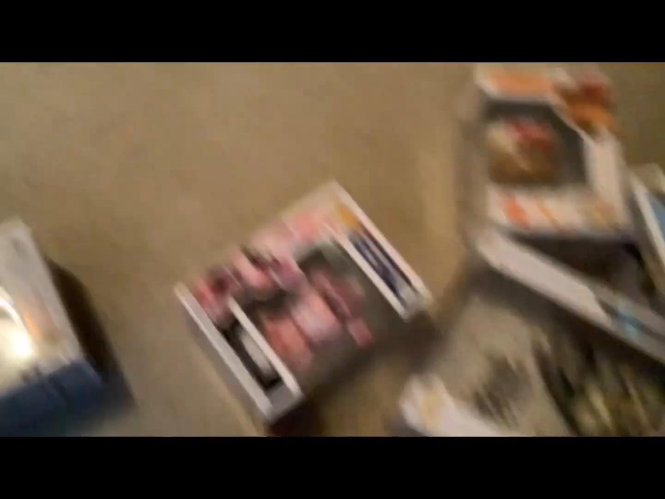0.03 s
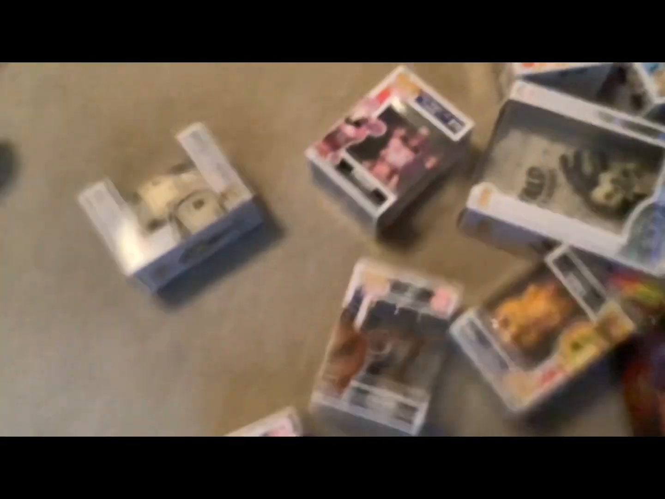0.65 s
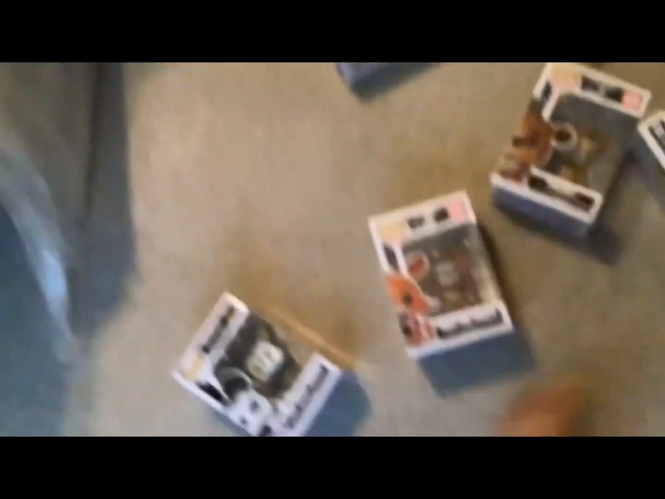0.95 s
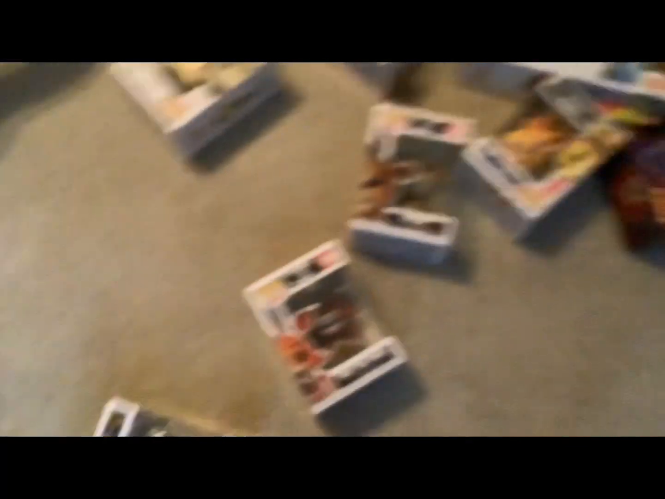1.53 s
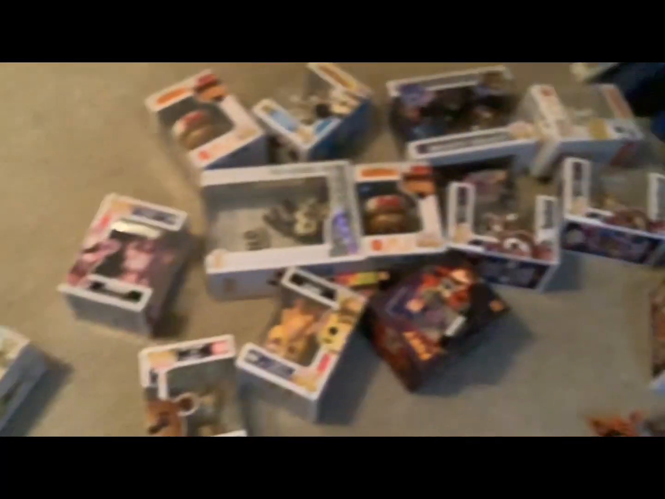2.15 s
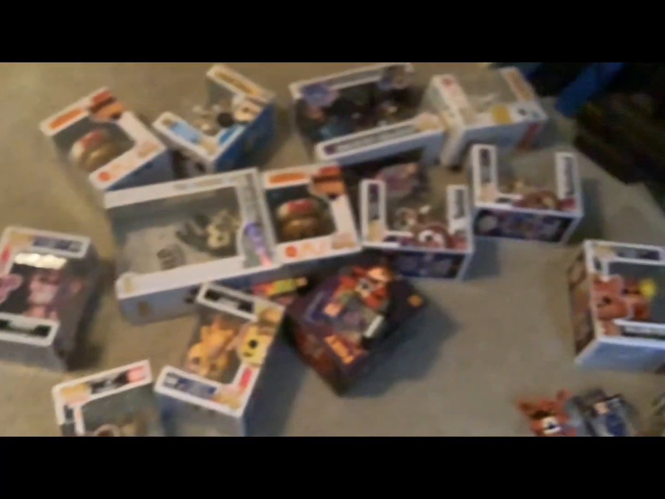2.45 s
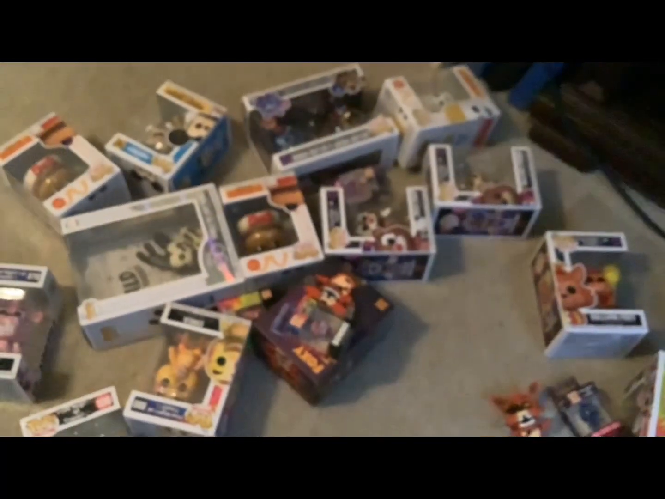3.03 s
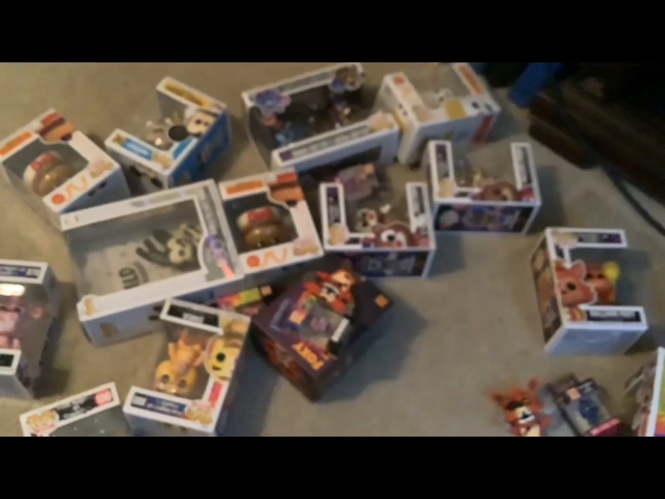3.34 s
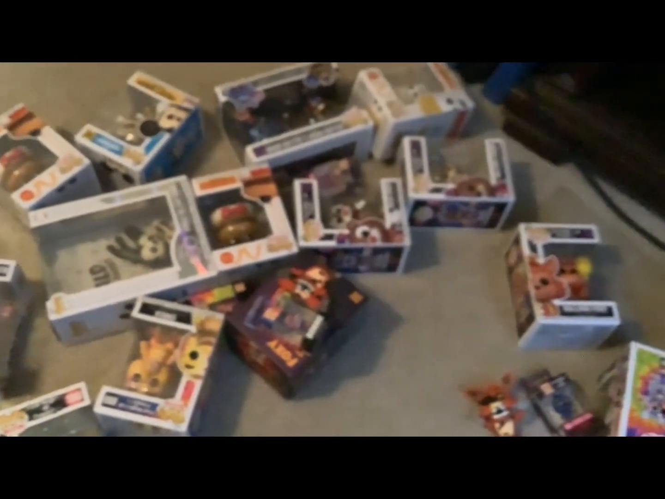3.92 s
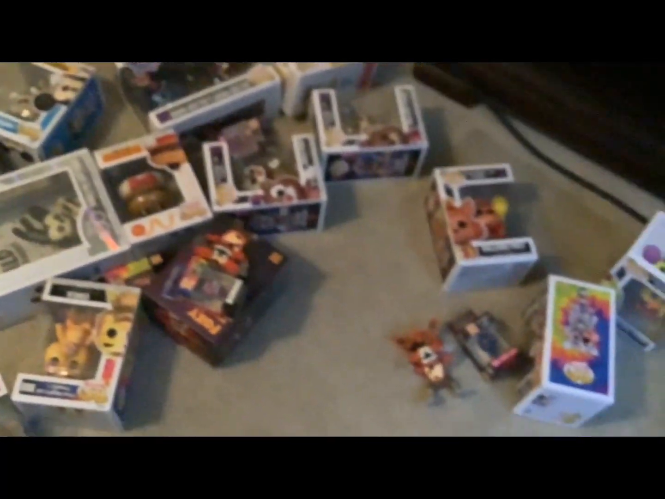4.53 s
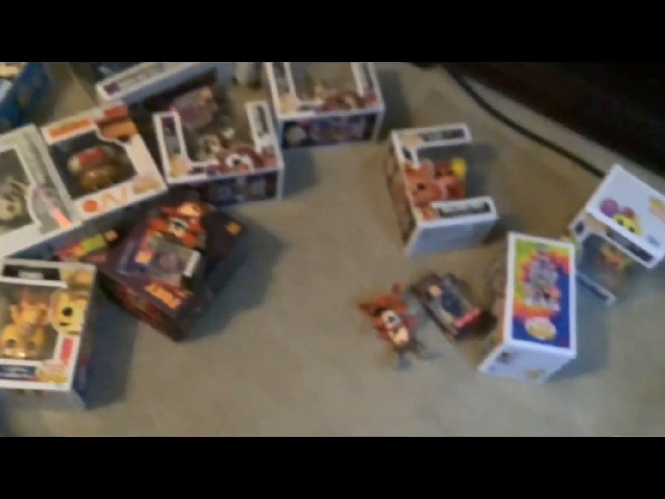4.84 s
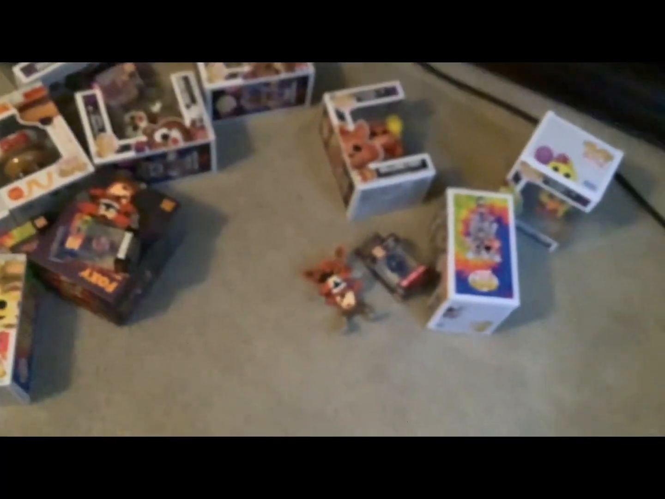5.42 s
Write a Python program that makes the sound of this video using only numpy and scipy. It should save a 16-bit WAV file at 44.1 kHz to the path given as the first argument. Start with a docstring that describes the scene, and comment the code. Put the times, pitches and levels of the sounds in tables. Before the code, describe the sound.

In a small, quiet carpeted room, a finger knocks against a handheld camera with one loud, close thump and briefly scrapes across the case. A few handling ticks follow. Soft footsteps and rustling clothes then grow a little, with a cluster of sharp clicks from small things underfoot. The clicks become sparser and fainter, and the movement settles to near quiet.

```python
"""A small carpeted room, where someone steps around with a camera in hand. A finger bumps the case
with a loud thump and slides off it, and the case ticks under the grip. These knocks reach the microphone
as bending waves in the camera's shell, treble first. Small things click underfoot, heard through the air
with the room's echo. Soft steps, rustling clothes and the quiet of the house lie underneath."""
import sys
import numpy as np
from scipy import signal
from scipy.fft import rfft, irfft
from scipy.io import wavfile

SR = 44100
rng = np.random.default_rng(int(sys.argv[2]) if len(sys.argv) > 2 else 0)


def unload_wav(signal):
    """Save mono or channel-first audio to the path in sys.argv[1] as 16-bit WAV at rate SR, clipped to [-1, 1]."""
    wavfile.write(
        sys.argv[1],
        SR,
        np.round(np.clip(np.atleast_2d(signal).T, -1, 1) * 32767).astype(np.int16),
    )


N = 250488
SIZE = 16384  # samples of working space for one knock or echo
TIME = np.arange(N) / SR
SCENE_HZ = np.maximum(np.fft.rfftfreq(N, 1 / SR), 1)
KNOCK_HZ = np.maximum(np.fft.rfftfreq(SIZE, 1 / SR), 1)

# The tone of the camera's shell: pitch_hz, relative_db
SHELL_TONE = [(30, -40), (200, -6.5), (500, 5.5), (1100, 2), (2000, -0.5), (3200, -7.5), (4700, -6),
              (6500, -15), (9000, -18.5), (16000, -29.5)]
# Arm moves that rub the clothes and shift the hand: time_s, hold_s, cloth_relative_db, skin_relative_db
ARM_MOVES = [(0.055, 0.022, -63.5, -67), (0.191, 0.012, -78, -66), (0.376, .035, -73.5, -65.5),
             (0.465, 0.023, -70.5, -76), (1.103, 0.12, -65.5, -74), (1.518, 0.039, -67, -76.5),
             (2.169, 0.037, -53, -62), (2.32, 0.097, -56.5, -60.5), (2.484, 0.17, -63, -66),
             (2.617, 0.11, -57, -63), (2.847, 0.089, -58.5, -63.5), (3.02, 0.079, -67, -99),
             (3.36, 0.34, -74, -77), (3.713, 0.093, -79, -70.5), (3.911, 0.034, -66, -63),
             (4.08, 0.13, -75.5, -72.5), (4.258, 0.15, -68.5, -69), (5.58, .05, -73, -78)]
ARM_ATTACK_S, ARM_FALL_DB_PER_S = 0.032, 139.5


def undb(db):
    """Turn decibels into a gain to multiply by."""
    return 10 ** (np.asarray(db) / 20)


def unit(x):
    """Scale a signal to an average strength (rms) of 1."""
    return x / np.std(x)


def along(points, hz):
    """Read between (pitch, value) points, with octaves evenly spaced."""
    pitches, values = np.transpose(points)
    return np.interp(np.log(hz), np.log(pitches), values)


def colour(x, tone):
    """Shape a sound's bass and treble, and scale it to strength 1."""
    return unit(irfft(rfft(x) * undb(along(tone, SCENE_HZ)), N))


def add(out, start_s, x, peak_db):
    """Mix x into out at the given time and peak level."""
    start = int(start_s * SR)
    part = x[:N - start]
    out[start:start + len(part)] += part * undb(peak_db) / np.abs(x).max()


def wander(turns_per_s):
    """A curve that drifts at random, with a spread near 1."""
    knots = rng.standard_normal(4096)
    return unit(np.interp(TIME * turns_per_s, np.arange(len(knots)), knots))


def contact(tone, bright_db, pitch_hz, ring_db, ring_q):
    """Spectrum of one hit: each has its own brightness, and the spot that is hit rings at its own pitch."""
    octaves = np.log2(np.maximum(KNOCK_HZ, 400) / 1000)
    log_gain = np.log(undb(along(tone, KNOCK_HZ) + bright_db * octaves))
    # keeping half the cepstrum means nothing sounds before the hit
    cepstrum = irfft(log_gain)[:SIZE // 2]
    ring = 1 + undb(ring_db) / (1 + 1j * ring_q * (KNOCK_HZ / pitch_hz - pitch_hz / KNOCK_HZ))
    return np.exp(rfft(2 * cepstrum, SIZE) - cepstrum[0]) * ring


def bend(spectrum, lag_s):
    """High bending waves travel faster than low ones, so a knock becomes a short falling chirp."""
    turns = lag_s * (2 * np.sqrt(1000 * KNOCK_HZ) - KNOCK_HZ * np.sqrt(2000 / SR))
    return irfft(spectrum * np.exp(-2j * np.pi * turns))[:SIZE // 2]


def scatter(share_db, decay_s):
    """Spectrum of a pulse followed by a dying cloud of reflections."""
    cloud = rng.standard_normal(SIZE) * np.exp(-np.arange(SIZE) / SR / decay_s)
    return 1 + undb(share_db) * rfft(cloud) / np.linalg.norm(cloud)


def pops(per_s, spread_db, max_spreads):
    """Tiny pulses of uneven size at random times."""
    sizes = undb(spread_db * np.minimum(rng.exponential(size=N), max_spreads))
    signs = rng.choice([-1, 1], N)
    return sizes * signs * (rng.random(N) < per_s / SR)


def friction(grains_per_s, spread_db, grain_db, flutter_db, flutter_per_s):
    """Surfaces catch and slip: lone grains over a dense hiss, at an uneven level."""
    grains = unit(pops(grains_per_s, spread_db, max_spreads=4))
    rub = rng.standard_normal(N) + undb(grain_db) * grains
    return rub * undb(flutter_db * wander(flutter_per_s))


def strokes(rows, attack_s, fall_db_per_s):
    """Loudness curve of strokes: each swells up to its time, holds, then dies away."""
    power = np.zeros(N)
    for time_s, hold_s, level_db in rows:
        swell = np.exp(np.minimum(TIME - time_s, 0) / attack_s)
        fall_db = fall_db_per_s * np.maximum(TIME - time_s - hold_s, 0)
        power += (swell * undb(level_db - fall_db)) ** 2
    return np.sqrt(power)


def stirring(level_db, still_s=4.5, fall_db_per_s=117):
    """Loudness curve of faint, steady motion that settles once the walker stands still."""
    return undb(level_db - fall_db_per_s * np.maximum(TIME - still_s, 0))


def quiet_house(level_db=-75.5):
    """The house makes a faint, steady, low noise."""
    # The tone of the quiet: pitch_hz, relative_db
    house_tone = [(15, -47.5), (25, -17.5), (64, -1), (97, 0.5), (170, -9), (373, -7), (463, -11),
                  (754, -15.5), (1040, -23), (1560, -26), (5000, -29.5), (6920, -30), (16000, -25)]
    return colour(rng.standard_normal(N), house_tone) * undb(level_db)


def room_echo(x, gap_s=0.0048):
    """Reflections blur into a short tail, and the treble dies first."""
    # How long the room takes to fade by 60 dB: pitch_hz, fade_s
    fade_times = [(100, 0.45), (500, 0.6), (2000, 0.3), (5000, 0.21), (15000, 0.12)]
    pitches, fades = np.transpose(fade_times)
    t, tail = np.arange(SIZE) / SR, np.zeros(SIZE)
    noise = rfft(rng.standard_normal(SIZE))
    for fade_s, one_band in zip(fades, np.eye(len(fades))):
        band = along(np.column_stack([pitches, one_band]), KNOCK_HZ)
        tail += irfft(noise * band) * undb(-60 * t / fade_s)
    tail *= t > gap_s
    return signal.fftconvolve(x, tail / np.linalg.norm(tail))[:N]


def footsteps():
    """Feet press softly on the carpet and make a low rumble."""
    # Steps and shifts of weight: time_s, hold_s, level_db
    steps = [(0.052, 0.043, -63), (0.482, 0.028, -58.5), (0.605, 0.12, -63), (0.843, 0.076, -53.5),
             (1.101, .07, -63), (1.209, 0.1, -60), (1.381, 0.13, -66), (1.71, 0.02, -57.5),
             (2.144, 0.068, -47.5), (2.316, 0.1, -54), (2.467, .1, -60), (2.649, 0.03, -48),
             (2.76, 0.4, -61.5), (3.299, 0.23, -71), (3.757, 0.033, -62), (4.102, 0.18, -66.5),
             (4.291, 0.11, -61.5), (4.788, 0.027, -62.5), (5.06, 0.027, -66), (5.462, 0.02, -65.5),
             (5.569, .06, -69)]
    # The dull tone of feet on carpet: pitch_hz, relative_db
    tread_tone = [(25, -45), (50, -26), (80, -5), (115, 2), (165, -4), (235, -1.5), (380, -5), (600, -9.5),
                  (1200, -24.5), (3000, -47)]
    weight = np.hypot(strokes(steps, attack_s=0.019, fall_db_per_s=209.5), stirring(-72))
    noise = rng.standard_normal(N) * undb(0.79 * wander(25))
    return colour(noise, tread_tone) * weight


def crinkles():
    """Creases in the moving cloth give way with little snaps."""
    # The tone of the snaps: pitch_hz, relative_db
    snap_tone = [(200, -15), (800, -4), (2000, -3), (3200, -7), (4600, 0), (6500, -13), (16000, -26)]
    snaps = pops(per_s=70, spread_db=4, max_spreads=2)
    smear = irfft(scatter(share_db=2.17, decay_s=0.002))
    return colour(signal.fftconvolve(snaps, smear)[:N], snap_tone)


def rustling_clothes(brisk_db=-56, brightening=0.37):
    """Fibres rub as the arms move; brisk rubbing brings out a bright swish and crinkles."""
    # The tone of soft rubbing: pitch_hz, relative_db
    cloth_tone = [(150, -15), (250, -2.5), (550, 4.5), (950, -4.5), (1400, -2.5), (2200, -5), (3000, -19.5),
                  (6000, -27.5), (16000, -40)]
    # The tone of brisk rubbing: pitch_hz, relative_db
    swish_tone = [(500, -15), (1000, -2.5), (2000, -1), (3000, 0), (4500, -2), (6500, -13), (16000, -24)]
    moves = [(time_s, hold_s, cloth_db) for time_s, hold_s, cloth_db, _ in ARM_MOVES]
    rub = np.hypot(strokes(moves, ARM_ATTACK_S, ARM_FALL_DB_PER_S), stirring(-76.5))
    fibres = friction(grains_per_s=200, spread_db=2, grain_db=-5, flutter_db=2, flutter_per_s=50)
    cloth = colour(fibres, cloth_tone) * undb(-1.5)
    swish = colour(fibres, swish_tone) * undb(-5.5) + crinkles() * undb(-9)
    briskness = (rub / undb(brisk_db)) ** brightening
    return (cloth + swish * briskness) * rub


def shifting_hand():
    """Skin slips on the case with a thin hiss as the arms move."""
    # The tone of slipping skin: pitch_hz, relative_db
    hiss_tone = [(1500, -15), (4000, -5), (8000, -0.5), (12000, 0.5), (15500, 1.5)]
    moves = [(time_s, hold_s, skin_db) for time_s, hold_s, _, skin_db in ARM_MOVES]
    slip = np.hypot(strokes(moves, ARM_ATTACK_S, ARM_FALL_DB_PER_S), stirring(-90))
    skin = friction(grains_per_s=1500, spread_db=2.5, grain_db=-9.5, flutter_db=1.5, flutter_per_s=40)
    return colour(skin, hiss_tone) * slip * undb(0.87)


def floor_clicks():
    """Small things crack and ring underfoot. Returns the direct sound and the sound sent to the room."""
    # Clicks and creaks: start_s, peak_db, bright_db_per_octave, pitch_hz, room_relative_db
    clicks = [(2.1530, -34, -0.5, 4720, 1), (2.1650, -33.5, -2.5, 1910, -8), (2.2130, -41, 0, 4500, -3),
              (2.3570, -44, 2.5, 4300, -4.5), (2.5935, -21, 3, 4860, -14.5), (2.6006, -32, 1, 4600, -2.5),
              (2.6515, -32.5, 9, 11000, -1.5), (2.7056, -42.5, 4.5, 4500, 4),
              (2.7782, -38.5, -0.5, 1900, -4), (2.8330, -20, 2.5, 4250, -3),
              (2.9188, -32.5, 3.5, 3800, -7.5), (2.9680, -37.5, 0, 1210, -12), (3.7490, -41, 3, 1406, 3),
              (3.8069, -39.5, 3, 900, -2.5), (4.0997, -46, 0, 1210, -2), (4.2795, -48.5, 10, 2460, 6.5),
              (4.3291, -33.5, 2, 1983, -3.5), (4.5057, -43, 0.5, 2055, -1), (4.7900, -58.5, -3.5, 802, -3),
              (5.0545, -49, -2, 561, -6), (5.3850, -59.5, 0, 850, 5), (5.4561, -43, -2.5, 2900, 0.5),
              (5.5644, -43, -1, 2100, 1.5)]
    # The tone they share: pitch_hz, relative_db
    click_tone = [(50, -30.5), (110, 5.5), (230, 12), (380, -2), (600, 6), (1000, -1.5), (2200, -4.5),
                  (2800, -6.5), (3700, -6), (4500, -7.5), (6000, -20.5), (9000, -20), (16000, -36.5)]
    direct, to_room = np.zeros(N), np.zeros(N)
    for start_s, peak_db, bright_db, pitch_hz, room_db in clicks:
        knock = contact(click_tone, bright_db, pitch_hz, ring_db=9.5, ring_q=4.53)
        # a distant click has more room in it and is smeared longer by nearby surfaces
        smear = scatter(share_db=4 + room_db, decay_s=0.0025 * undb(0.65 * room_db))
        crack = irfft(knock * smear)[:SIZE // 2]
        add(direct, start_s, crack, peak_db)
        add(to_room, start_s, crack, peak_db + room_db)
    return direct, to_room


def grip_ticks():
    """The case ticks under the grip, and each tick runs through the shell."""
    # Ticks of the case: start_s, peak_db, bright_db_per_octave, pitch_hz
    ticks = [(0.0381, -34.5, 5, 1440), (0.17, -52.5, -1, 2550), (0.2446, -58, -1, 480),
             (.7130, -32, -9.5, 2200), (0.7520, -30.5, 10.5, 4180), (.8175, -18.5, 6, 7700),
             (0.822, -31, 3, 7740), (.8370, -27, 1.5, 2340), (0.8763, -37, 8, 5500),
             (1.093, -39, -5.5, 2620), (1.0950, -37.5, 3, 7040), (1.217, -39, 9, 5190),
             (1.2208, -32, -0.5, 2190), (1.3320, -45, -0.5, 1445), (1.5061, -37, -2, 2115),
             (1.5112, -32.5, 4, 10490), (1.7170, -40, -6, 709), (1.7271, -41, -2.5, 1057),
             (2.1271, -46, -6.5, 1085), (2.1563, -35, 1, 1769), (2.408, -40, -0.5, 486),
             (2.6502, -35, 1, 790), (3.4397, -50, 8, 13030), (4.2276, -48.5, 4, 3960)]
    out = np.zeros(N)
    for start_s, peak_db, bright_db, pitch_hz in ticks:
        knock = contact(SHELL_TONE, bright_db, pitch_hz, ring_db=7, ring_q=5.8)
        knock *= scatter(share_db=-6.5, decay_s=0.0012)
        add(out, start_s, bend(knock, lag_s=0.0029), peak_db)
    return out


def finger_slide():
    """Skin scrapes over the case after the bump."""
    # The finger lands, then slides, pressing hard briefly midway: time_s, hold_s, level_db
    scrapes = [(0.682, 0.011, -45.5), (0.74, 0.18, -48.5), (0.806, .012, -38)]
    # The tone of the scrape: pitch_hz, relative_db
    slide_tone = [(30, -20), (90, -2), (200, -0.5), (400, -1), (570, 0.5), (850, -10.5), (2000, -9),
                  (4400, -13), (7700, -17.5), (11000, -25.5), (16000, -25.5)]
    skin = friction(grains_per_s=1300, spread_db=4, grain_db=-6.5, flutter_db=1.52, flutter_per_s=140)
    return colour(skin, slide_tone) * strokes(scrapes, attack_s=0.0099, fall_db_per_s=351.5)


def finger_bump():
    """A finger lands on the case in a few quick hits that run through the shell."""
    # The hits: start_s, peak_db, bright_db_per_octave, pitch_hz
    hits = [(0.6796, -29.5, 4.5, 4800), (0.6842, -26, 4, 4666), (0.6828, -11.5, -3, 1770),
            (0.685, -11.5, -1, 1159), (0.6864, -6.5, -0.5, 4900), (0.689, -23.5, 3.5, 4488),
            (0.693, -25, 3.5, 4710)]
    out = np.zeros(N)
    for start_s, peak_db, bright_db, pitch_hz in hits:
        knock = contact(SHELL_TONE, bright_db, pitch_hz, ring_db=3.5, ring_q=6)
        knock *= scatter(share_db=-6.5, decay_s=0.0036)
        add(out, start_s, bend(knock, lag_s=0.0028), peak_db)
    return out


def body_thump(start_s=0.6881, peak_db=-3, soft_hz=700):
    """The bump sets the whole camera swinging; the soft fingertip dulls the higher notes."""
    # The camera's low notes: pitch_hz, relative_db, fade_s (time to fall by 60 dB)
    notes = [(86, -21, .17), (178, 1.5, .05), (196, -12, 0.083), (330, -24, 0.052), (455, -13.5, 0.056),
             (558.4, -16.5, 0.072)]
    t, out = np.arange(SIZE) / SR, np.zeros(N)
    ring = sum(undb(db - 60 * t / fade_s) * np.cos(2 * np.pi * hz * t) for hz, db, fade_s in notes)
    soft_push = 1 / (1 + 1j * KNOCK_HZ / soft_hz) ** 2
    add(out, start_s, bend(rfft(ring) * soft_push, lag_s=0.0021), peak_db)
    return out


def scene():
    """All the sounds meet at one microphone."""
    knocks = finger_bump() + grip_ticks() + body_thump()
    clicks, to_room = floor_clicks()
    echo = room_echo(undb(-3) * to_room + undb(-31.5) * knocks)
    quiet = quiet_house()
    movement = finger_slide() + footsteps() + rustling_clothes() + shifting_hand()
    return (quiet + echo + movement + clicks + knocks)[None]


def record(dry):
    """The camera cuts off the highest treble."""
    top_hz = 16000
    return signal.sosfilt(signal.ellip(10, 0.2, 70, top_hz, fs=SR, output="sos"), dry)


dry = scene()
out = record(dry)
unload_wav(out)
```